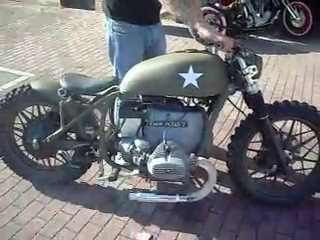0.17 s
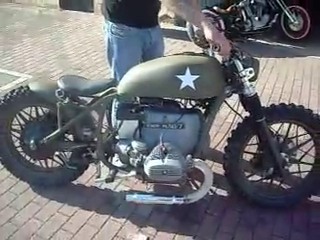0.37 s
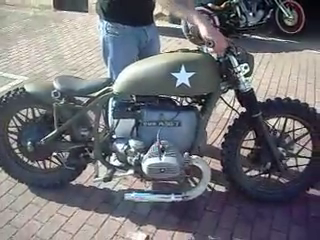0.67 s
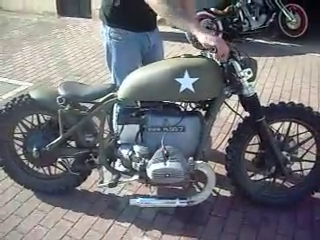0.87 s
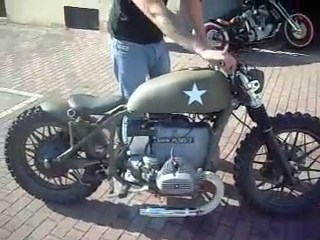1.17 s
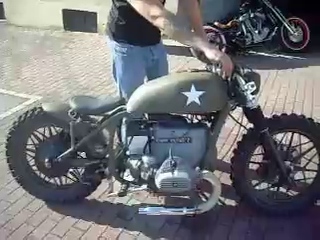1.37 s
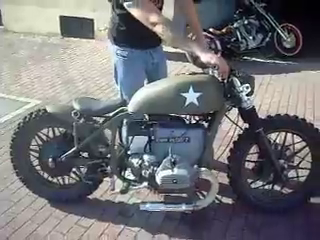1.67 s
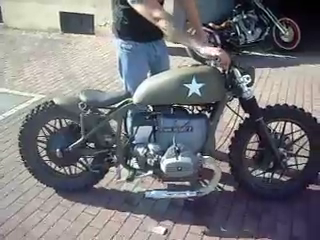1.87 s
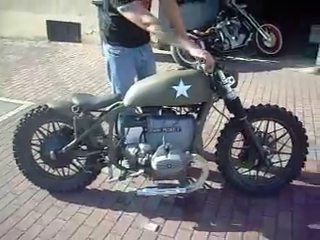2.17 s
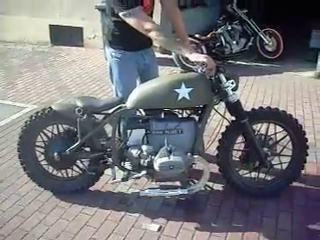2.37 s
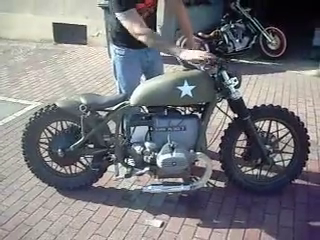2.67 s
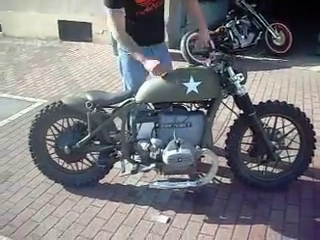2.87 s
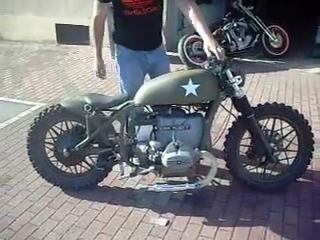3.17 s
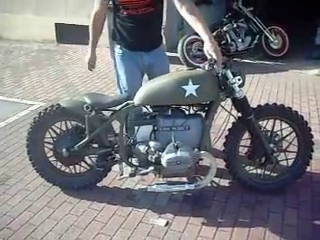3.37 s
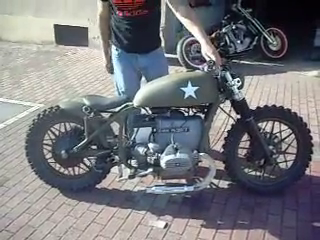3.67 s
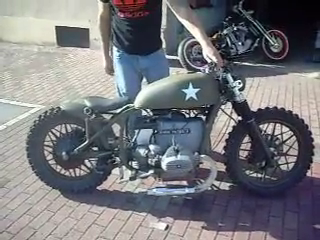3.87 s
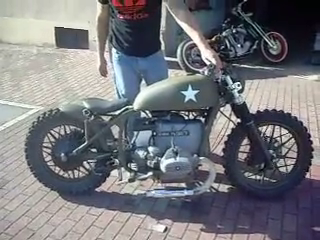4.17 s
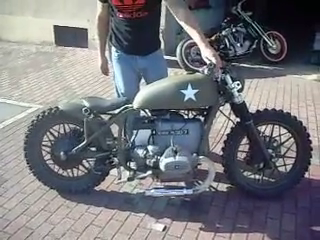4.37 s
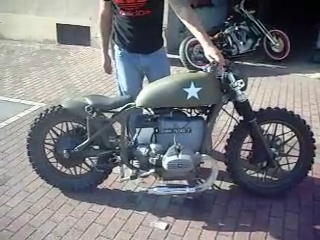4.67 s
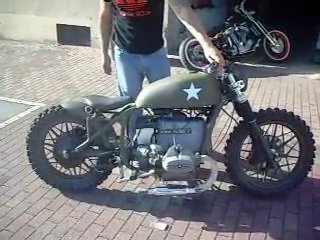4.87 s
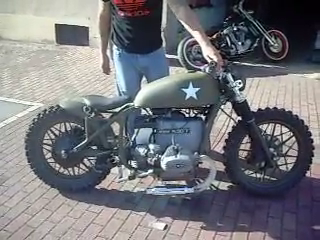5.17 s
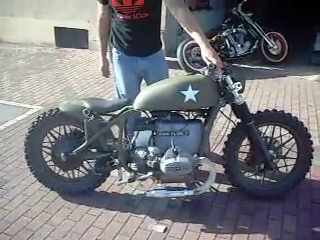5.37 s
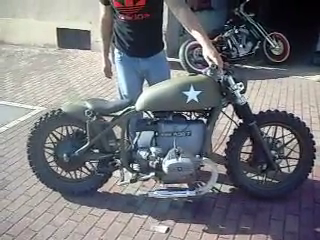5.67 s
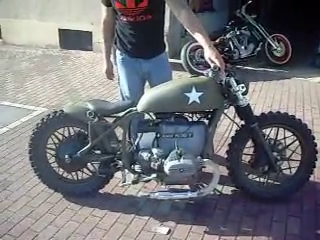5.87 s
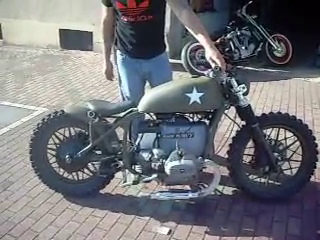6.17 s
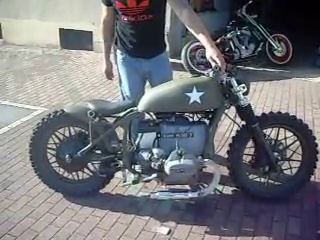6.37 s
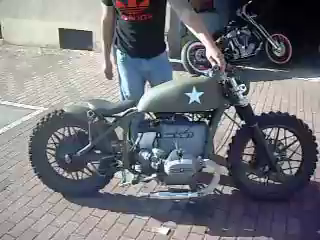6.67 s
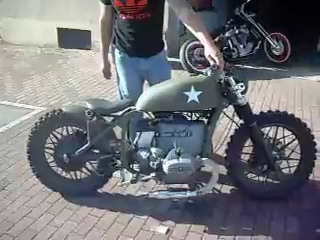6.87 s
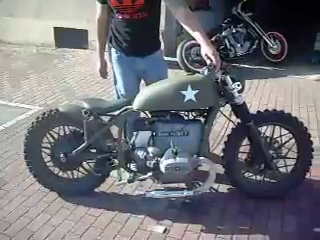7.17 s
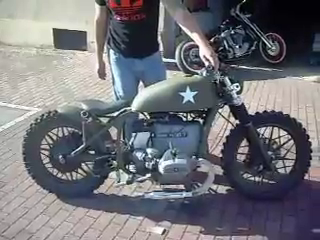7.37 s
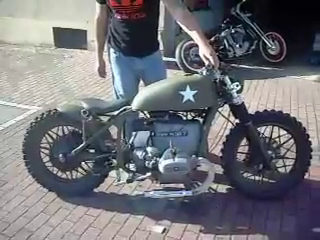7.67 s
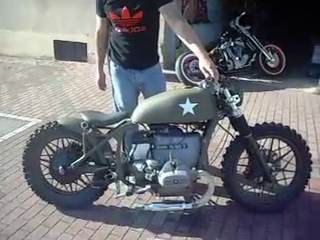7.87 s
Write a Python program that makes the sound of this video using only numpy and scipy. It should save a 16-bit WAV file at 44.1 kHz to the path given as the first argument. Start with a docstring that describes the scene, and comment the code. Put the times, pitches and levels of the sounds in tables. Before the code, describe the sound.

Close, harsh motorcycle engine on paving: four sharp throttle revs with crackling fall-offs, a ragged faster run, then slow, irregular popping idle.

```python
"""Outdoors on paving, a few metres from a microphone, a flat-twin motorcycle engine runs on short open pipes.
It is blipped four times, held at a fast idle, then lopes along with misfires. Each firing is a noise burst
with pitched notes (crack) plus a train of pressure pulses (thump). Crank orders sound the pumping and the roar,
shaped noise the gas rush and one carburettor's whistle. Walls answer; the narrow-band microphone ducks and clips."""
import sys
import numpy as np
from scipy import signal
from scipy.fft import rfft, irfft, next_fast_len
from scipy.io import wavfile
from scipy.ndimage import uniform_filter1d, map_coordinates

SR = 44100
rng = np.random.default_rng(int(sys.argv[2]) if len(sys.argv) > 2 else 0)


def wav_out(sig):
    """Save sig, one row per channel (or a flat mono array), as 16-bit PCM at SR to the path in sys.argv[1]."""
    wavfile.write(sys.argv[1], SR, np.round(np.clip(np.atleast_2d(sig).T, -1, 1) * 32767).astype(np.int16))


N = 353682
IDLE_TURNS = 16  # reference idle speed, turns/s


def amp(db):
    """Decibel law: level in dB to amplitude gain."""
    return 10 ** (np.asarray(db) / 20)


def unit(x):
    """Power normalisation: scaled to rms 1."""
    return x / np.sqrt(np.mean(x ** 2) + 1e-20)


def curves(rows):
    """Linear interpolation: one value per sample for each column after the time."""
    s, *cols = np.transpose(rows)
    return [np.interp(np.arange(N) / SR, s, c) for c in cols]


def wobble(rate):
    """Band-limited fluctuation: a smooth random curve through `rate` knots a second."""
    knots = rng.standard_normal(int(N * rate / SR) + 4)
    return map_coordinates(knots, [np.arange(N) * rate / SR])


def filtered(x, response):
    """Linear filtering: the spectrum of x times a complex response of frequency."""
    m = next_fast_len(N + SR // 2)
    spectrum = rfft(x, m) * response(np.fft.rfftfreq(m, 1 / SR))
    return irfft(spectrum, m)[..., :N]


def colour(points):
    """Spectral shaping: gain through (Hz, dB) points on a logarithmic frequency axis."""
    f, db = np.transpose(points)
    return lambda hz: amp(np.interp(np.log(hz + 1), np.log(f + 1), db))


def resonances(modes):
    """Modal superposition: causal response of (Hz, width Hz, dB) modes in alternating sign."""
    def response(f):
        total = 0
        for k, (centre, width, db) in enumerate(modes):
            damping = 1j * f * width
            total = total + (-1) ** k * amp(db) * damping / (centre ** 2 - f ** 2 + damping)
        return total
    return response


def burst(u):
    """Transient envelope: swells to 1 at u = 1, then decays."""
    u = np.maximum(u, 0)
    return u ** 3 * np.exp(3 - 3 * u)


def slugs(s, size, width_s):
    """Impulse-train convolution: smooth Gaussian pressure pulses at the times s."""
    at = np.clip(np.round(s * SR), 0, N - 1).astype(int)
    train = np.bincount(at, size, N)
    t = np.arange(-400, 401) / SR
    return signal.fftconvolve(train, np.exp(-.5 * (t / width_s) ** 2), "same")


def level_db(law, speed, gas, coasting):
    """Linear level law: dB rise with crank speed, gas (opening or flow) and coasting."""
    idle_db, per_turn, open_db, coast_db = law
    return idle_db + per_turn * (speed - IDLE_TURNS) + open_db * gas + coast_db * coasting


# crank speed after the blips: (time [s], speed [turns/s])
SPEED_AFTER_BLIPS = [(2.9, 30), (3.03, 28), (3.1, 23), (3.6, 17), (4.2, 19), (4.8, 24), (5.4, 25),
                     (6, 17.5), (8.1, 15.5)]
# throttle blips: (first firing [s], speed there [turns/s], time of top speed [s], top speed [turns/s],
# slowing [turns/s2], throttle shuts [s], last firing [s], opening [0-1], flow decay time [s],
# first crack after shutting [dB], fade by the last firing [dB])
BLIPS = [(.007, 16.6, .294, 44.87, 37.48, .308, .92, 1, .25, -1, 20),
         (1.031, 23.41, 1.278, 43.21, 35.98, 1.285, 1.78, .6, .03, 1.5, 18),
         (1.798, 26.03, 1.961, 33.07, 11.68, 2.01, 2.25, .4, .04, -4, 14),
         (2.411, 25.89, 2.62, 35.23, 20.84, 2.68, 2.9, .3, .04, -7, 11)]
# fast idle: (from [s], to [s], throttle opening [0-1])
FAST_IDLE = (4.05, 5.4, .12)
EDGE_S = 0.032  # time the twist grip takes to move


def throttle():
    """Kinematics: crank speed, throttle opening, the gas flow that trails it, and coasting when shut."""
    t = np.arange(N) / SR
    speed, = curves(SPEED_AFTER_BLIPS)
    start, end, share = FAST_IDLE
    opening = share * ((t > start) & (t < end))
    flow, coasting = opening.copy(), np.zeros(N)
    for first, slow, top, fast, slowing, shut, last, share, linger, *_ in BLIPS:
        rising = slow + (fast - slow) * (t - first) / (top - first)
        falling = fast - slowing * (t - top)
        rev = np.where(t < top, rising, falling)
        begun = t > first - EDGE_S
        speed = np.where(begun & (t < SPEED_AFTER_BLIPS[0][0]), rev, speed)
        opening += share * (begun & (t < shut))
        flow += share * begun * np.exp(-np.maximum(t - shut, 0) / linger)
        coasting += (t >= shut) & (t < last)
    return speed, *uniform_filter1d([opening, flow, coasting], round(EDGE_S * SR), mode="nearest")


# uneven firings off the blips: (time [s], relative crack level [dB])
UNEVEN_FIRINGS = [(2.292, -10.5), (2.333, -2.5), (3.03, -5), (3.201, -26), (3.255, -5.5), (3.3, -10),
                  (3.507, -28), (3.569, -3), (3.622, -11), (3.803, -18), (3.866, -6.5), (3.928, -8),
                  (4.054, -2.5), (4.111, -3.5), (4.168, -0.5), (4.273, -1), (4.32, -4.5), (4.368, -1),
                  (4.464, -2), (4.507, -1.5), (4.553, -0.5), (4.642, -2), (4.684, -9), (4.731, -0.5),
                  (4.773, -9), (4.816, 1), (4.9, -3), (4.94, -7), (4.983, -2), (5.022, -19), (5.066, -1),
                  (5.106, -1.5), (5.147, -3), (5.185, -5.5), (5.227, -3.5), (5.265, -7.5), (5.305, -1),
                  (5.344, -7.5), (5.385, -1), (5.421, -22), (5.462, -33), (5.505, -30), (5.55, -15),
                  (5.595, -26), (5.688, -9), (5.842, -5.5), (5.89, -3), (6.118, -6), (6.177, -6.5),
                  (6.351, -7), (6.47, -23), (6.537, -5.5), (6.592, -11.5), (6.703, -22), (6.83, -10),
                  (6.894, -3), (7.085, -10.5), (7.146, -13), (7.207, -15.5), (7.274, -9.5), (7.334, -9.5),
                  (7.463, -12), (7.528, -6), (7.729, -9.5), (7.794, -9.5), (7.854, -38), (7.921, -24),
                  (7.988, -8.5)]
NEAR_EARLY_S, SHUT_LATE_S = .0016, .0069  # the near pipe is heard sooner; a shut throttle delays the crack
OPEN_DB, OPEN_GAIN_DB, SCATTER_DB = -0.5, 4.5, 0.8  # crack under load, gain at full opening, random spread
FAR_DB, FAR_FADE_DB, FADE_BEND = -6, -7, 1.42  # throttle shut: the far cylinder is weaker and dies sooner
# crack pitch: lowest, typical upward stray, rise per turn/s at full opening
CORE_HZ, STRAY_HZ, LOAD_HZ = 2178.5, 232, 48.9


def firings(speed, opening):
    """Periodic excitation: in a blip the cylinders fire in turn, far one first, once a revolution.

    Returns times [s], relative levels [dB] and pitches [Hz]."""
    rows, t = list(UNEVEN_FIRINGS), np.arange(N) / SR
    turn = np.arange(40)
    near, far = turn % 2, turn % 2 == 0
    for first, _, _, _, _, shut, last, share, _, shut_db, fade_db in BLIPS:
        running = t >= first
        turned = np.cumsum(speed * running) / SR
        s = first + np.interp(turn, turned[running], t[running] - first) - NEAR_EARLY_S * near
        gone = np.clip((s - shut) / (last - shut), 0, 1) ** FADE_BEND
        coast_db = shut_db - fade_db * gone + far * (FAR_DB + FAR_FADE_DB * gone)
        db = np.where(s < shut, OPEN_DB + OPEN_GAIN_DB * share, coast_db)
        db = db + SCATTER_DB * rng.standard_normal(len(s))
        rows += list(zip(s + SHUT_LATE_S * (s >= shut), db))[:np.sum(s < last)]
    s, db = np.transpose(sorted(rows))
    at = np.round(s * SR).astype(int)
    stray = STRAY_HZ * np.exp(0.67 * rng.standard_normal(len(s)))
    return s, db, CORE_HZ + stray + LOAD_HZ * opening[at] * (speed[at] - IDLE_TURNS)


def crank(s, speed):
    """Phase locking: crank angle in turns, whole at the firings, dead turns counted from the speed."""
    rough = np.cumsum(speed)[(s * SR).astype(int)] / SR
    turns = np.cumsum(np.r_[0, np.maximum(np.round(np.diff(rough)), 1)])
    times = np.r_[-.04, s, s[-1] + .064]
    angle = np.interp(np.arange(N) / SR, times, np.r_[-1, turns, turns[-1] + 1])
    return uniform_filter1d(angle, size=2000, mode="nearest")  # about 45 ms


# spectrum of the blowdown noise: (frequency [Hz], relative level [dB])
CRACK_SPECTRUM = [(240, -12.5), (400, -12), (588, -26.5), (864, -10.5), (1520, -16.5), (1810, -17.5),
                  (2450, -3.5), (3400, -10), (3730, -17), (5010, -12.5), (6000, -30), (7800, -82.5),
                  (13200, -120)]
# upper pipe modes: (frequency [Hz])
PIPE_MODES_HZ = [921, 1132, 1370, 1570]
NEAR_HOLLOW_DB = 10  # the near pipe's hollow notes stand out


def cracks(fired, near):
    """Impulsive blowdown: gated noise, a pitched core and pipe modes, returned by the paving."""
    t = np.arange(1600) / SR - .008
    grit = unit(filtered(rng.standard_normal(N), colour(CRACK_SPECTRUM)))
    notes, gate = np.zeros((2, N + 2 * len(t)))
    mode_hz = np.array(PIPE_MODES_HZ)[:, None]
    chance = rng.standard_normal((len(fired), 3 + 2 * len(PIPE_MODES_HZ)))
    for (s, db, hz), side, (phase, late, wide, *modes) in zip(fired, near, chance):
        u = (t + .0008) / (.0024 * amp(1.5 * wide))
        shape = burst(u) + 0.35 * burst(u - 1.9 - 0.14 * late)  # second burst: paving return
        leak = 0.28 * burst((t + 0.0055) / 0.0069)  # the valve hisses as it starts to lift
        tail = 0.11 * (t > 0) * amp(-60 * t / 0.022)
        core = shape * np.sin(2 * np.pi * hz * t + 2 * phase)
        size, turn = np.reshape(modes, (2, -1, 1))
        hollow = (amp(1.65 * size) * np.sin(2 * np.pi * mode_hz * t + 2 * turn)).sum(axis=0)
        hollow_db = 0.47 * db - 31 + NEAR_HOLLOW_DB * side  # weak firings sound more hollow
        at = round(s * SR)
        gate[at:][:len(t)] += amp(db - 8.0) * (shape + leak + tail)
        notes[at:][:len(t)] += amp(db - 6.0) * core
        notes[at:][:len(t)] += amp(hollow_db) * burst((t + 0.0012) / 0.0036) * hollow
    lead = round(-t[0] * SR)
    return gate[lead:][:N] * grit, notes[lead:][:N]


# the slug and its returns along the pipe: (time after the crack before scaling by speed [s], gain [ratio])
PIPE_RETURNS = [(.0018, 1), (.0058, -.75), (.013, .25), (.02, -.13), (.026, .12), (.032, -.07)]
# thump level law: (idle [dB], rise [dB per turn/s above idle], full opening [dB], coasting [dB])
THUMP_LEVEL = (-20, 0.2146, 2.5, -23)
HOT_PER_TURN = 0.015  # hotter gas at speed shortens the trips: off the trip factor per turn/s


def thumps(s, db, load_db, speed):
    """Open-end reflection: a slug of gas runs up and down the pipe, changing sign at the open end."""
    at = np.round(s * SR).astype(int)
    load_db = load_db[at]
    trip = 1.2 - HOT_PER_TURN * (speed[at] - IDLE_TURNS)
    # weak cracks still thump
    size = amp(load_db + 0.22 * np.minimum(db, -2) + 0.5 * rng.standard_normal(len(s)))
    push = sum(slugs(s + late * trip, gain * size, .00095 + .03 * late)  # later returns are blunter
               for late, gain in PIPE_RETURNS)
    suction = slugs(s - .0014, size * amp(1.4 * (load_db + 16)), .0007)  # deeper under load
    suction += filtered(suction, resonances([(290, 140, -0.5)]))  # the header rings
    early_dip = .2 * slugs(s - .0035, size, .0014)
    return push - suction - early_dip


# spectrum of the gas and valve-gear hiss: (frequency [Hz], relative level [dB])
RUSH_SPECTRUM = [(150, -69.5), (250, -5), (513, -25.5), (687, -9.5), (744, -12), (1410, -12.5), (1740, -17),
                 (1890, -16), (2700, -6.5), (3670, -21.5), (4720, -10), (6000, -25.5), (7800, -85.5),
                 (13200, -120)]
# rush level law: (idle [dB], rise [dB per turn/s above idle], full gas flow [dB], coasting [dB])
RUSH_LEVEL = (-38.5, 0.5417, 13.5, 1)


def rush(angle, level_db):
    """Amplitude-modulated noise: ragged hiss swells near each blowdown and dips once in two turns."""
    swell_db = 1.7 * np.cos(2 * np.pi * (angle + 0.024)) + 0.77 * np.cos(4 * np.pi * (angle - .1))
    dip_db = -4.5 * np.maximum(np.cos(np.pi * (angle - .7)), 0) ** 8
    grain_db = 3.1 * wobble(60) + 1.0 * wobble(500)
    hiss = unit(filtered(rng.standard_normal(N), colour(RUSH_SPECTRUM)))
    rasp_modes = resonances([(3500, 270, 7.5), (4700, 1400, -8.0)])
    rasp = unit(filtered(rng.standard_normal(N), rasp_modes))
    hiss = hiss + amp(0.37 * (level_db + 1)) * rasp  # faster gas is brighter
    return amp(level_db) * unit(amp(swell_db + dip_db + grain_db) * hiss)


# pumping harmonics: (crank order [cycles/turn], relative level [dB])
PUMPING_ORDERS = [(1, -8), (1.5, -18), (2, 0), (3, -9), (3.5, -14), (4, -6), (5, -13), (6, -9), (6.5, -14),
                  (7, -7), (8, -9), (9, -12)]
# pumping level law: (idle [dB], rise [dB per turn/s above idle], full opening [dB], coasting [dB])
PUMPING_LEVEL = (-46, 0.6082, 4, 5)


def pumping(angle, level_db, speed):
    """Harmonic synthesis: pistons pump the pipes at low orders of the flywheel's turning, on a rumble."""
    smooth = uniform_filter1d(angle, size=1300, mode="nearest")
    lines = sum(amp(db + 1.2 * wobble(8)) * np.cos(2 * np.pi * k * smooth - .4 * k * k)
                for k, db in PUMPING_ORDERS)
    rumble = filtered(rng.standard_normal(N), resonances([(92, 55, -8.5), (236, 43, -17.5)]))
    puffs = (1 + np.cos(2 * np.pi * (angle - .05))) ** 2
    puffs = puffs * amp(-4.0 - 0.39 * (speed - IDLE_TURNS))  # slow strokes stand apart
    return amp(level_db) * (unit(lines) + puffs * unit(rumble))


# whistle level law: (idle [dB], rise [dB per turn/s above idle], full opening [dB], coasting [dB])
WHISTLE_LEVEL = (-42, -0.1, 12, -1)


def whistle(angle, level_db):
    """Resonant flow noise: the near carburettor draws air through its throat once in two turns."""
    stroke = np.maximum(np.cos(np.pi * (angle + 0.017)) + 0.25, 0) ** 2.6
    throat = resonances([(4676, 210, 0)])
    tone = unit(filtered(rng.standard_normal(N), lambda f: throat(f) ** 2))
    tube = unit(filtered(rng.standard_normal(N), resonances([(1553, 63, 0)])))
    tone += amp(-4.5) * tube  # the intake tube hums along
    return amp(level_db + 1 + wobble(40)) * stroke * tone


# roar harmonics: (crank order [cycles/turn], relative level [dB])
ROAR_ORDERS = [(2, -8), (3, 0), (4.5, -7), (5, -6), (7, -6), (8, -5)]
# roar level law: (idle [dB], rise [dB per turn/s above idle], full opening [dB], coasting [dB])
ROAR_LEVEL = (-56, 0.81, 12.5, -17)


def roar(angle, level_db):
    """Order excitation: under load the pipes sing on a few harmonics of the crank."""
    lines = sum(amp(db + 1.5 * wobble(14)) * np.cos(2 * np.pi * k * angle + k * k)
                for k, db in ROAR_ORDERS)
    return amp(level_db) * unit(lines)


def yard(x):
    """Diffuse reverberation: nearby walls return a short, exponentially decaying answer."""
    t = np.arange(SR // 4) / SR
    tail = rng.standard_normal(len(t)) * amp(-60 * t / 0.44) * (t > .012)
    return signal.fftconvolve(x, tail / np.linalg.norm(tail))[:N]


def scene():
    """Superposition: the pressures of all sources add at the microphone."""
    speed, opening, flow, coasting = throttle()
    s, db, hz = firings(speed, opening)
    angle = crank(s, speed)
    near = np.round(angle[(s * SR).astype(int)]) % 2
    grit, notes = cracks(np.transpose([s, db, hz]), near)
    thump = thumps(s, db, level_db(THUMP_LEVEL, speed, opening, coasting), speed)
    engine = rush(angle, level_db(RUSH_LEVEL, speed, flow, coasting))
    engine += pumping(angle, level_db(PUMPING_LEVEL, speed, opening, coasting), speed)
    engine += whistle(angle, level_db(WHISTLE_LEVEL, speed, opening, coasting))
    engine += roar(angle, level_db(ROAR_LEVEL, speed, opening, coasting))
    answer = yard(amp(-11.5) * grit + amp(-12.5) * thump)
    return (grit + notes + thump + answer + engine)[None]


MIC_HZ, TOP_HZ = 5600, 16400  # microphone band edge, output cut-off


def record(dry):
    """Nonlinear distortion: a narrow-band stage ducks just after overloads and clips, which adds treble."""
    def band(hz):
        return 1 / np.sqrt(1 + (hz / MIC_HZ) ** 36) * hz ** 2 / (hz ** 2 + 30 ** 2)

    def output(hz):
        return (hz < TOP_HZ) * amp(-3 * np.clip(hz / 1500 - 4, 0, 1))  # droops above 6 kHz

    heard = filtered(dry, band)
    t = np.arange(SR // 10) / SR
    memory = burst(t / 0.009) / burst(t / 0.0054).sum()
    excess = np.maximum(np.abs(heard) - .6, 0)
    overload = signal.fftconvolve(excess, memory[None])[:, :N]
    heard = heard / (1 + 12 * np.abs(overload))
    clipped = heard / (1 + np.abs(heard / .7) ** 9) ** (1 / 9)
    return filtered(clipped - .0036, output)  # a small constant offset


dry = scene()
out = record(dry)
wav_out(out)
```